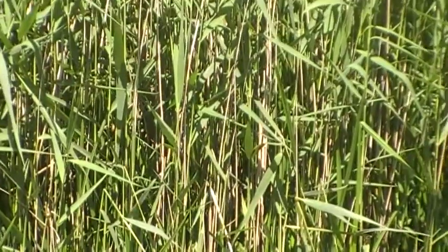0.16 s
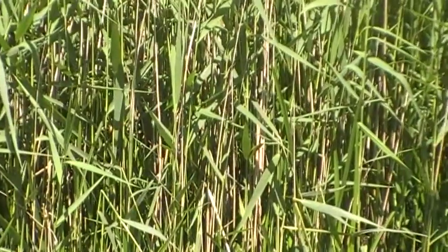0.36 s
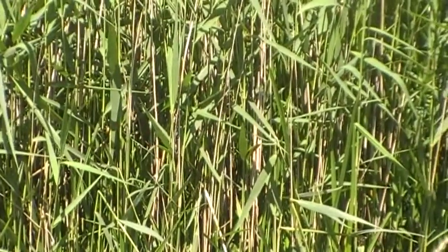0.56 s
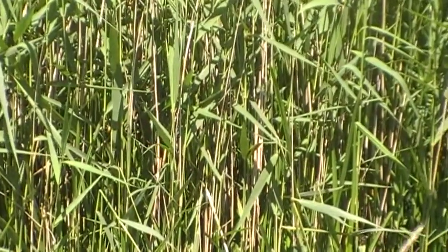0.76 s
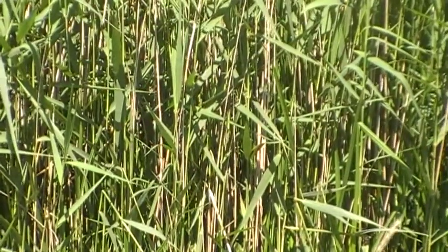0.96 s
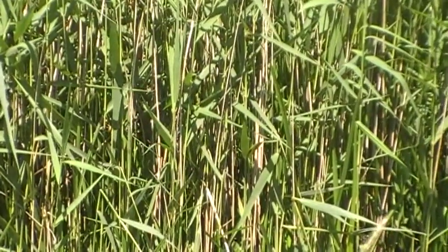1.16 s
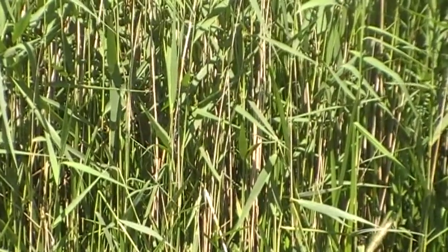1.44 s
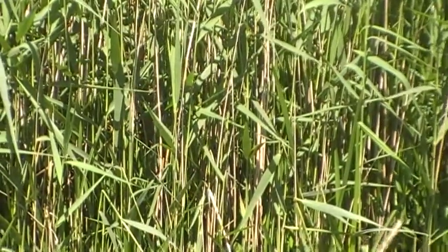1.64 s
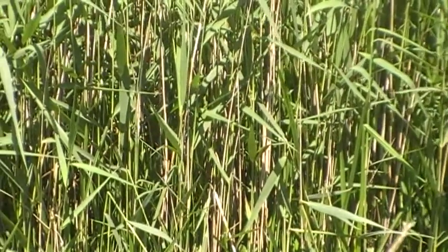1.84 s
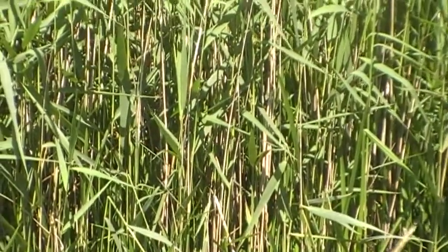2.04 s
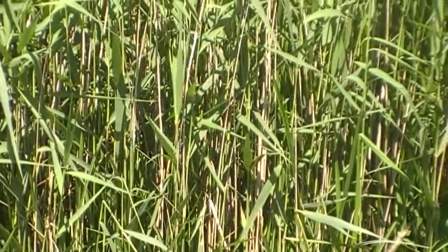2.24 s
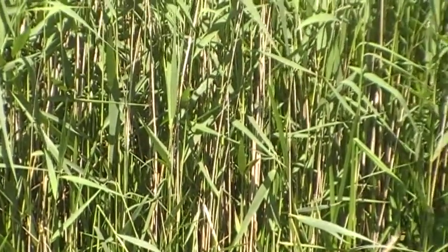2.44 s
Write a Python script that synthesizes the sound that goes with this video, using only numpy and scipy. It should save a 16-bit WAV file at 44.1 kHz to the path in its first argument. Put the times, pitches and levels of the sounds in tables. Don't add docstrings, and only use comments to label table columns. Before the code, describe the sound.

A warbler close by in reeds sings a steady run of short chirps, dry chups and raspy churrs, while fainter high birds call behind; soft leaf hiss, low wind rumble and a distant engine hum, outdoors in stereo.

```python
import sys
import numpy as np
from scipy import signal
from scipy.fft import rfft, irfft
from scipy.io import wavfile
from scipy.ndimage import uniform_filter1d, map_coordinates

SR = 44100
rng = np.random.default_rng(int(sys.argv[2]) if len(sys.argv) > 2 else 0)


def voltage_ratio(level):
    return 10 ** (np.asarray(level, float) / 20)


def generate_wav(sig):
    pcm = np.round(np.clip(np.atleast_2d(sig).T, -1, 1) * 32767).astype(np.int16)
    wavfile.write(sys.argv[1], SR, pcm)


N = 113778


def unit(x):
    return x / np.sqrt(np.mean(x ** 2) + 1e-20)


def along(points, hz):
    f, v = np.transpose(points)
    return np.interp(np.log(hz + 1), np.log(f + 1), v)


def wobble(rate, count=N):
    knots = rng.standard_normal(int(count * rate / SR) + 4)
    return map_coordinates(knots, [np.arange(count) * rate / SR])


def panned(x, db):
    return x * voltage_ratio(np.array([[db / 2], [-db / 2]]))


# frequency in Hz, likeness from -1 to 1.
LIKENESS = [(60, .9), (170, .3), (350, -.4), (800, -.3), (1600, .1), (3100, .4), (15000, .2)]
# frequency in Hz, left over right in dB.
LEFT_LEAN = [(60, -1.2), (1300, -0.43), (15000, -0.8)]


def rush(spectrum, patchy_db):
    z = signal.stft(rng.standard_normal((2, N + 8192)), nperseg=512)[2]
    patches = uniform_filter1d(rng.standard_normal(z.shape[1:]), size=6, axis=0)
    patches = uniform_filter1d(patches, size=14, axis=1)
    pair = signal.istft(z * voltage_ratio(patchy_db * unit(patches)), nperseg=512)[1]
    hz = np.fft.rfftfreq(pair.shape[1], 1 / SR)
    turn = np.arccos(np.clip(along(LIKENESS, hz), -1, 1)) / 2
    mid, side = rfft(pair) * voltage_ratio(along(spectrum, hz)) * [np.cos(turn), np.sin(turn)]
    lean = voltage_ratio(along(LEFT_LEAN, hz) / 2)
    both = np.array([(mid + side) * lean, (mid - side) / lean])
    return unit(irfft(both, pair.shape[1])[:, :N])


# frequency in Hz, level in dB per Hz.
AIR_SPECTRUM = [(25, -16), (42, -8), (76, -5.5), (150, -5.5), (290, -11), (750, -14.5), (1500, -19),
                (2400, -91)]


def air():
    return voltage_ratio(-52.5) * rush(AIR_SPECTRUM, patchy_db=0.0)


# frequency in Hz, level in dB per Hz.
LEAF_SPECTRUM = [(880, -89), (1500, -6.5), (2450, -9.5), (3280, -4), (5000, -15.5), (8000, -22),
                 (12000, -75)]


def leaves():
    return voltage_ratio(-60.5 + 0.41 * wobble(7.8)) * rush(LEAF_SPECTRUM, patchy_db=3.5)


# frequency in Hz, level in dB per Hz.
HISS_SPECTRUM = [(2500, -44), (5000, -2), (9080, 1.5), (12000, -7.5), (15600, -17.5)]


def far_hiss():
    return voltage_ratio(-68) * rush(HISS_SPECTRUM, patchy_db=2.0)


def low_murmur():
    start_s, full_s = 2.2, 2.58
    grows = np.clip((np.arange(N) / SR - start_s) / (full_s - start_s), 0, 1)
    return voltage_ratio(-54) * grows * rush([(90, -34), (170, 13), (330, -45)], patchy_db=3.0)


# frequency in Hz, level in dB, sway in dB.
HUM_LINES = [
    (65.15, -57, 1.5),
    (367.4, -70.5, 6),
    (724.5, -68.5, 3.5),
    (15623, -96, 1.1),
]
# time in seconds, level in dB.
ENGINE_LOAD = [(0.0, -52), (0.08, -60.5), (1.42, -54), (1.62, -69), (1.77, -54.5), (1.87, -81),
               (1.96, -54.5), (2.13, -57.5), (2.34, -70), (2.39, -59), (2.46, -71), (2.58, -68)]


def engine_hum():
    sway_rate = 14
    lines = 0
    for hz, db, sway_db in HUM_LINES:
        level = voltage_ratio(db + 1.5 + sway_db * wobble(sway_rate))
        pitch = hz + 0.02616 * min(hz, 400) * wobble(sway_rate)
        lines = lines + level * np.sin(2 * np.pi * np.cumsum(pitch) / SR)
    s, load_db = np.transpose(ENGINE_LOAD)
    load = voltage_ratio(np.interp(np.arange(N) / SR, s, load_db) + 1.5)
    throb_hz = 99.8 + 1.2 * wobble(sway_rate)
    throb = load * np.sin(2 * np.pi * np.cumsum(throb_hz) / SR)
    return panned(lines + throb, -3.5)


# start in seconds, level in dB, frequency in Hz, time to fall 60 dB in seconds.
SMALL_KNOCKS = [
    (.648, -44, 8600, .003),
    (1.919, -31, 8800, .002),
    (1.919, -43, 11500, .0015),
    (2.358, -35, 950, .018),
    (2.361, -43, 450, .07),
]


def ticks():
    out, t = np.zeros(N + SR), np.arange(SR // 10) / SR
    for s, db, hz, t60 in SMALL_KNOCKS:
        level = voltage_ratio(db - 60 * t / t60) * np.minimum(10 * t / t60, 1)
        sag = 1 - 0.35 * t / t60
        out[round(s * SR):][:len(t)] += level * np.sin(2 * np.pi * hz * t * sag)
    return panned(out[:N], 1.0)


def sing(rows, shape, pairs, levels_db, rough):
    out, (s, *cols) = np.zeros(N + SR), np.transpose(shape)
    t = np.arange(SR // 10) / SR
    count = len(t)
    fade = np.clip(np.minimum(t, s[-1] - t) / 0.0015, 0, 1)
    curves = [np.interp(t, s, c) for c in cols]
    hz1, db1, hz2, db2 = [uniform_filter1d(c, size=66, mode="nearest") for c in curves]
    for start, db, *ratio in rows:
        turns = []
        for hz in (hz1, hz2):
            pitch = hz * np.prod(ratio) * (1 + 0.004 * wobble(326, count))
            turns.append(2 * np.pi * np.cumsum(pitch) / SR)
        rasp, breath = wobble(900, count), voltage_ratio(-3) * wobble(6500, count)
        fray = rough * 0.5 * (rasp + breath)
        note = 0
        for (m, n), level_db in zip(pairs, levels_db):
            order = abs(m) + abs(n)
            shimmer_db = 1.2 * wobble(266.0, count)
            level = voltage_ratio(level_db + abs(m) * db1 + abs(n) * db2 + shimmer_db)
            note = note + level * (1 + order * fray) * np.sin(m * turns[0] + n * turns[1] + m * m)
        out[round(start * SR):][:count] += voltage_ratio(db) * fade * note
    return out[:N]


WHISTLE_MIX = [(1, 0), (.5, 1), (1.5, 1), (2, 1)]


def whistle(rows, shape, levels_db=(0,), rough=0.26, late_db=-34):
    end = shape[-1][0]
    two_sided = [(*row, 0, late_db * (1 - row[0] / end)) for row in shape]
    return sing(rows, two_sided, WHISTLE_MIX, levels_db, rough)


# frequency in Hz, time for the scatter to fall 60 dB in seconds.
REED_RING = [(3000, 0.15), (8000, 0.41)]


def reeds(x):
    hz, t, z = signal.stft(rng.standard_normal((2, SR // 2)), SR, nperseg=256)
    decay = voltage_ratio(-60 * t / along(REED_RING, hz)[:, None])
    a, b = signal.istft(z * decay, SR, nperseg=256)[1]
    turn = np.arccos(0.71) / 2
    shared, apart = a * np.cos(turn), b * np.sin(turn)
    tail = np.array([shared + apart, shared - apart]) / np.linalg.norm(a)
    delayed = np.pad(x, (round(.004 * SR), 0))
    return signal.fftconvolve(delayed[None], tail, axes=1)[:, :N]


# seconds after the start, frequency in Hz, level in dB.
CHIFF_SHAPE = [(0, 6900, -10), (.008, 6700, -5), (.014, 5800, -1), (.019, 5450, -3), (.032, 5420, 0),
               (.04, 5400, -14)]
CHAFF_SHAPE = [(0, 7050, -27), (.01, 6700, 2.5), (0.018, 5180, 1), (0.024, 4260, 6), (0.045, 4000, -4)]
TAIL_SHAPE = [(0, 5105, 4), (.006, 4666, 8.5), (0.013, 3860, 6), (.024, 3490, -0.5), (.038, 3240, -1)]
# start in seconds, peak level in dB.
CHIFF_TIMES = [(.311, -53.5), (1.463, -54.5), (1.864, -52.5), (2.246, -50.5)]
CHAFF_TIMES = [(.712, -58), (1.087, -56.5)]
TAIL_TIMES = [(.367, -62.5), (.775, -65.5), (1.52, -67), (1.906, -62.5), (2.295, -69)]


def far_caller():
    call = whistle(CHIFF_TIMES, CHIFF_SHAPE) + whistle(CHAFF_TIMES, CHAFF_SHAPE)
    call = call + whistle(TAIL_TIMES, TAIL_SHAPE)
    return panned(call, 10) + voltage_ratio(2.5) * reeds(call)


# seconds after the start, frequency in Hz, level in dB.
RISE_SHAPE = [(0, 1900, -10), (.02, 2544, -9), (0.037, 3040, -2.5), (.055, 3200, -3), (.078, 2920, -4)]
SWEET_SHAPE = [(0, 2950, -9), (.035, 3250, -3), (.05, 3600, 0), (.056, 3750, -14)]
PEEP_SHAPE = [(0, 2950, -20), (.008, 3010, 4), (0.021, 3110, -0.5), (0.033, 3140, -17)]
ARCH_SHAPE = [(0, 3470, -6), (.01, 4130, 1), (0.017, 4310, -10), (.024, 3600, -6), (.03, 2700, -10)]
LIFT_SHAPE = [(0, 5300, -1), (.03, 5600, 1), (0.056, 6200, -4), (.07, 6600, -8)]
# start in seconds, peak level in dB, and for peeps a pitch ratio.
RISE_TIMES = [(.592, -58), (1.745, -51.5)]
SWEET_TIMES = [(1.002, -48.5)]
PEEP_TIMES = [(.044, -57, 1.56), (.492, -59.5, 1.2), (1.15, -63, 0.89), (1.732, -60, 1.0),
              (2.15, -63, 1.01), (2.222, -64.5, 1.04), (2.455, -65, 1.05)]
ARCH_TIMES = [(1.47, -56)]
LIFT_TIMES = [(.37, -62)]


def far_whistler():
    song = whistle(RISE_TIMES, RISE_SHAPE) + whistle(SWEET_TIMES, SWEET_SHAPE)
    song = song + whistle(PEEP_TIMES, PEEP_SHAPE) + whistle(ARCH_TIMES, ARCH_SHAPE)
    song = song + whistle(LIFT_TIMES, LIFT_SHAPE)
    return panned(song, -3) + voltage_ratio(-5) * reeds(song)


# seconds after the start, frequency in Hz, level in dB.
CHEVRON_SHAPE = [(0, 2120, -15), (.006, 3170, -4.5), (.009, 4000, -18), (.012, 4822, -14),
                 (.018, 3170, -2.5), (.022, 2790, -7), (0.024, 2613, -6), (0.041, 2030, -10)]
SLIDE_SHAPE = [(0, 5340, -19), (.004, 4530, -0.5), (.009, 3210, 3), (.014, 2840, -10), (.02, 2700, -2),
               (.03, 2400, -4.5), (.044, 2230, -7.5), (0.054, 2070, -14)]
HOOK_SHAPE = [(0, 2794, -21), (.016, 2851, -6.5), (0.025, 3390, -3.5), (0.027, 3693, -12),
              (0.032, 3270, 1.5), (.034, 2500, 0), (0.038, 2090, 0.5), (.042, 1850, -10)]
# start in seconds, peak level in dB.
CHEVRON_TIMES = [(.021, -38.5), (.078, -40)]
SLIDE_TIMES = [(.436, -45)]
HOOK_TIMES = [(1.18, -32.5), (1.388, -35), (1.6, -33.5)]
CHEVRON_LEVELS = [0.5, -7, 1, -8]
SLIDE_LEVELS = [0, -6, 6, -8]
HOOK_LEVELS = [0, -14, -26]


def one_sided_syllables():
    return [whistle(CHEVRON_TIMES, CHEVRON_SHAPE, CHEVRON_LEVELS, rough=.6),
            whistle(SLIDE_TIMES, SLIDE_SHAPE, SLIDE_LEVELS, rough=.5, late_db=-24),
            whistle(HOOK_TIMES, HOOK_SHAPE, HOOK_LEVELS, rough=.2)]


# seconds after the start, first side in Hz, its dB, second side in Hz, its dB.
BUZZ_SHAPE = [(0, 1287, -1.5, 920, -10.5), (.015, 1274, -5, 954.5, 0.5), (0.039, 1253, 0, 942, 0),
              (0.052, 1290, -4, 937, -7)]
CHUP_SHAPE = [(0, 2117, -16, 3150, -45), (.006, 2190, 0.5, 3050, -4), (0.012, 2197, -2, 3228, 1.5),
              (0.016, 2290, -4.5, 3190, 1), (.032, 2345, -52, 3000, -49)]
CHERR_SHAPE = [(0, 2080, -8, 3100, -40), (.006, 2010, 0, 3000, -30), (.014, 1900, -4, 2700, -8),
               (.026, 1865, -5, 2440, -1), (.04, 1870, -11, 2390, 0), (.05, 1850, -20, 2310, -7),
               (.056, 1850, -25, 2280, -22)]
CHURR_SHAPE = [(0, 1518, -10, 1291, -5), (0.013, 1477, -4.5, 1251, -2), (0.027, 1449, -2, 1241, 0),
               (.045, 1440, -3, 1210, 2.5), (0.059, 1429, -4, 1150, -0.5), (.066, 1460, -10, 1113, -12)]
# start in seconds, peak level in dB, sometimes a pitch ratio.
BUZZ_TIMES = [(.259, -37)]
CHUP_TIMES = [(.643, -36.5, 1.034), (.706, -34.5, 0.99), (.905, -34.5, 1.01), (.969, -34, 0.98)]
CHERR_TIMES = [(1.819, -35), (2.024, -35)]
CHURR_TIMES = [(2.253, -36.5), (2.484, -37.5, 1)]
BUZZ_MIX = [(1, 0), (1, 1), (2, 0), (1, 2), (2, 1), (3, 0), (1, 3), (2, 2), (3, 1), (0, 3), (4, 0)]
CHUP_MIX = [(1, 0), (0, 1), (2, 0), (-1, 2), (1, 1), (0, 2)]
CHERR_MIX = [(1, 0), (0, 1), (2, 0), (3, 0), (1, 1), (0, 2), (0, 1.5), (2, 1), (1, .5), (3, -1)]
CHURR_MIX = [(1, 0), (2, 0), (1, 1), (3, -1), (2, 1), (3, 0), (0, 2), (2, 2), (3, 1), (1, 2), (1, 3),
             (3, 2), (4, 1)]
BUZZ_LEVELS = [-12, 1, -10.5, -14.5, -12.5, -11.5, -22, -8.5, -4.5, -24, -18]
CHUP_LEVELS = [-1.5, -2.5, -9, -13.5, -21.5, -26]
CHERR_LEVELS = [-8.5, -1, -5.5, -16, -7, -11, -16, -10, -18, -18]
CHURR_LEVELS = [-21.5, 1.5, -1.5, -12, -7, -3.5, -20, -16.5, -13.5, -15.5, -21.5, -31, -25]


def two_sided_syllables():
    return [sing(BUZZ_TIMES, BUZZ_SHAPE, BUZZ_MIX, BUZZ_LEVELS, rough=.03),
            sing(CHUP_TIMES, CHUP_SHAPE, CHUP_MIX, CHUP_LEVELS, rough=0.059),
            sing(CHERR_TIMES, CHERR_SHAPE, CHERR_MIX, CHERR_LEVELS, rough=.24),
            sing(CHURR_TIMES, CHURR_SHAPE, CHURR_MIX, CHURR_LEVELS, rough=.2)]


# frequency in Hz, gain in dB.
THROAT_GAIN = [(2600, -2), (3250, 3), (4800, -2), (6000, -1.5), (11000, 7.5)]
# delay in seconds, level in dB.
BANK_ECHOES = [
    (.011, -14),
    (.044, -20),
]


def warbler():
    song = np.array(one_sided_syllables() + two_sided_syllables())
    throat = voltage_ratio(along(THROAT_GAIN, np.fft.rfftfreq(N, 1 / SR)))
    song = irfft(rfft(song) * throat, N)
    echoes = 0
    for s, db in BANK_ECHOES:
        arrived = np.arange(N) > s * SR
        echoes = echoes + voltage_ratio(db) * np.roll(song, round(s * SR), axis=1) * arrived
    return sum(panned(x, -2.5) + voltage_ratio(-4.5) * reeds(x) for x in song + echoes)


def scene():
    floor = air() + leaves() + far_hiss() + low_murmur() + engine_hum()
    return floor + ticks() + far_caller() + far_whistler() + warbler()


def band_limit(x):
    return signal.sosfilt(signal.butter(12, 15710, fs=SR, output="sos"), x)


def record(dry):
    below_top = np.fft.rfftfreq(N, 1 / SR) < 15710
    kept = irfft(rfft(dry) * below_top, N)
    return band_limit(kept)


dry = scene()
out = record(dry)
generate_wav(out)
```